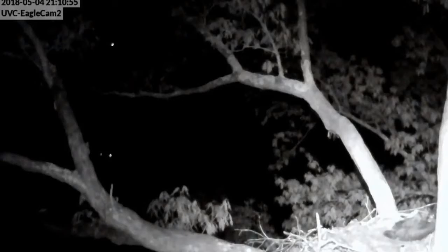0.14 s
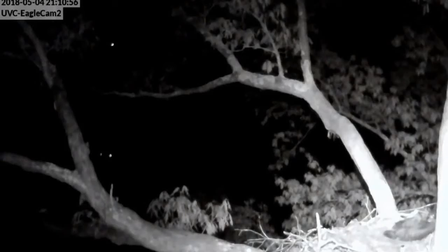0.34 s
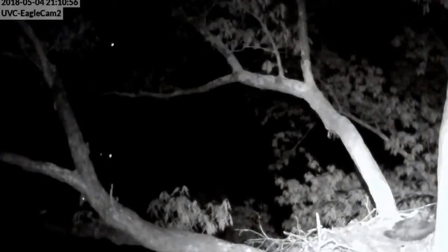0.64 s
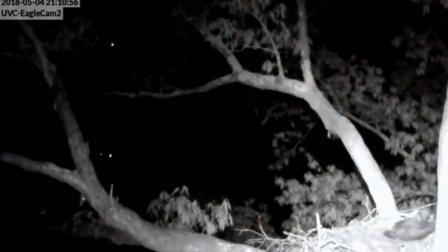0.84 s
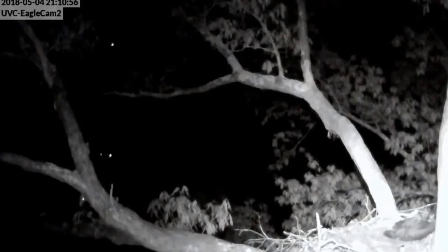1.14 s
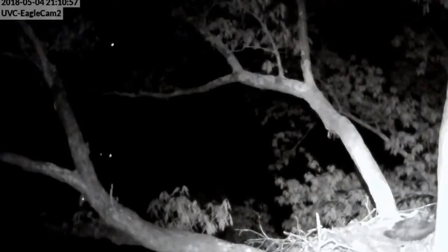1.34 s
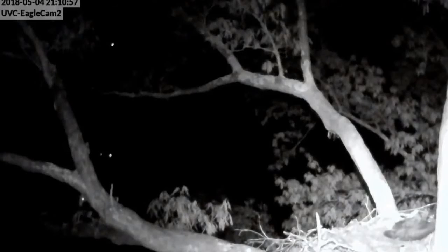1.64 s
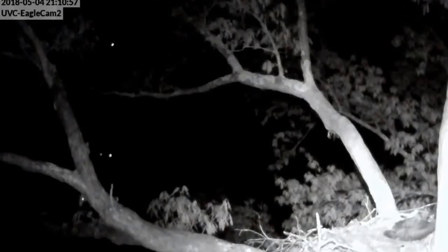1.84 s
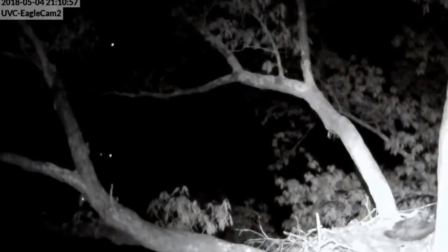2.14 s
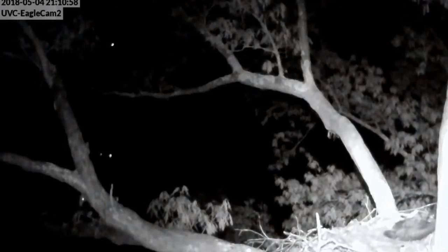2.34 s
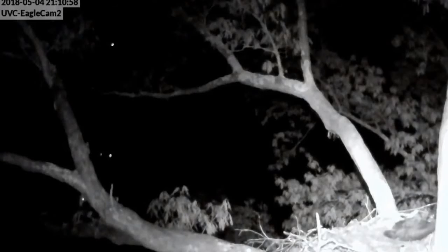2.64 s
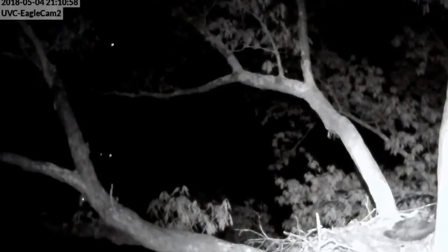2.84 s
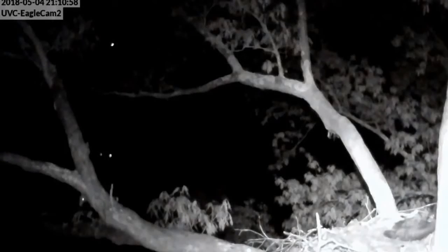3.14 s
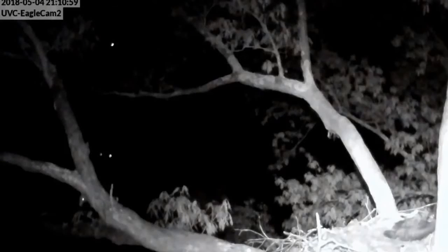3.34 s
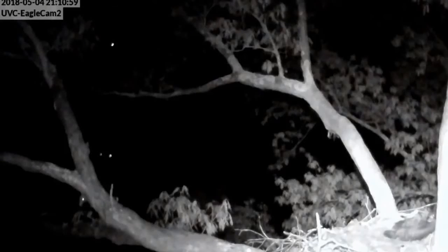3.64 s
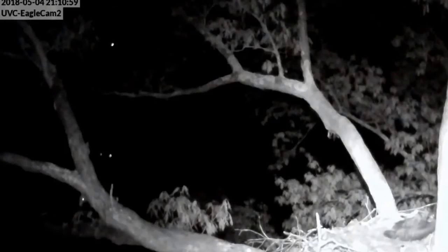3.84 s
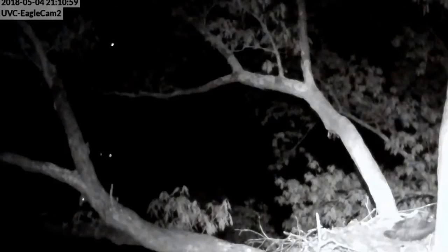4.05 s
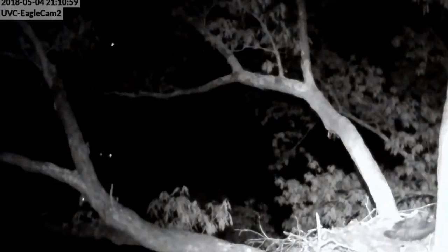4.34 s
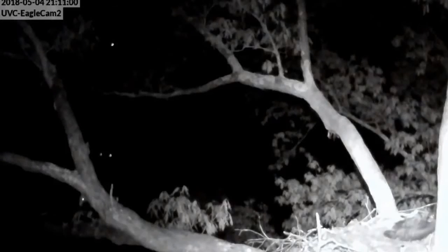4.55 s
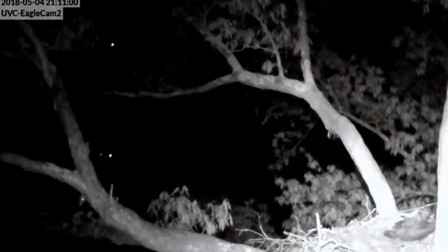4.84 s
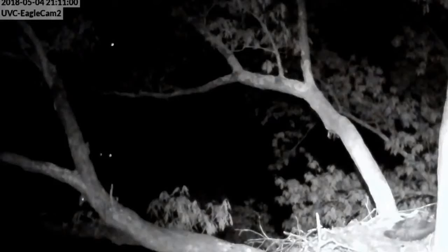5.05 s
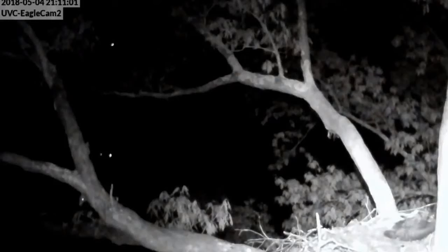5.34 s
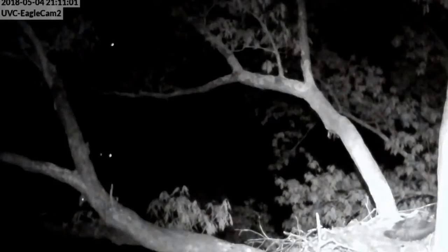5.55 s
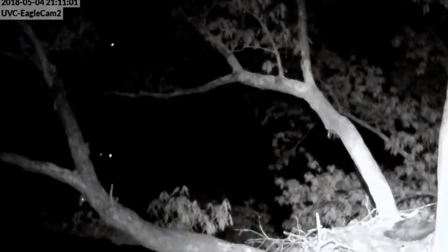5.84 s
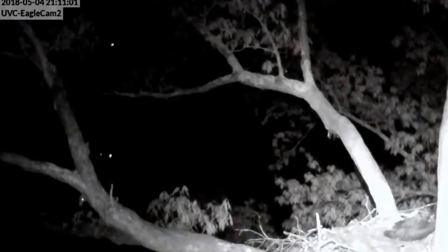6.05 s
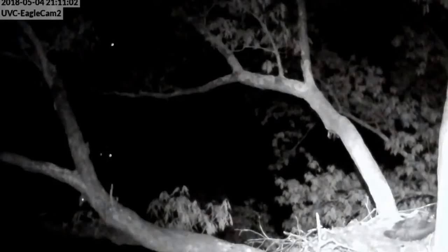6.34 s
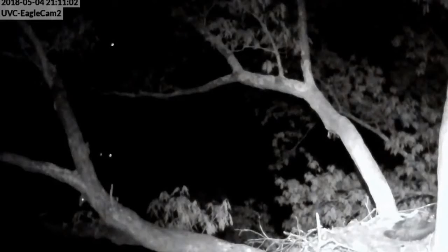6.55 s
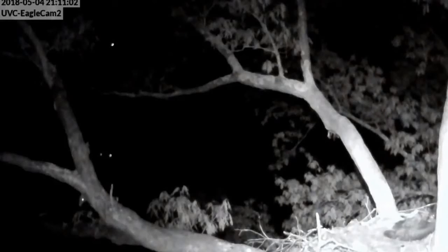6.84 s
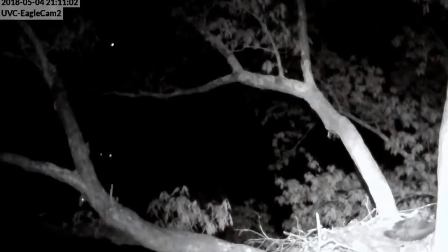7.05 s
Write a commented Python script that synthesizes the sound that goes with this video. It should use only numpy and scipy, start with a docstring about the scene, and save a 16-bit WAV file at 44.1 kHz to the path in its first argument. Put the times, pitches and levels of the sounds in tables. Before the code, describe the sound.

Night alarm calls from large birds: a loud rasping, clacking burst, a gap, then rapid chatter at about ten syllables a second. As it dies, a rounder owl-like hoot rises and falls with a fluttering end. Quiet follows, then piercing squeaky chatter, a lone late squeal and a final pair of calls. Woodland reverberation, soft hiss and a distant low hum surround them, captured by a gritty outdoor microphone with slightly clipped peaks.

```python
"""An eagles' nest high in a tree at night, heard through a low-rate outdoor microphone.
The birds chatter in alarm: hoarse syllables of noise puffs and uneven throat clacks, many breaking into
shrill, stuttering whistles. As a bout dies out a lower hoot, perhaps an owl's, rises, holds and sinks with
a waver: harmonics through a throat resonance. Decaying-noise echoes give the wood's ring over air and hum."""
import sys
import numpy as np
from scipy import signal
from scipy.fft import rfft, irfft, next_fast_len
from scipy.io import wavfile
from scipy.ndimage import uniform_filter1d

SR = 44100
rng = np.random.default_rng(int(sys.argv[2]) if len(sys.argv) > 2 else 0)


def file_out(sig):
    """Save sig as 16-bit WAV at sys.argv[1]."""
    # one column per channel
    cols = np.atleast_2d(sig).T
    # limit, then scale
    lim = np.clip(cols, -1, 1)
    pcm = np.round(lim * 32767).astype(np.int16)
    wavfile.write(sys.argv[1], SR, pcm)


N = 317079
TIME_S = np.arange(N) / SR

# All levels in the tables are relative; each source adds its own gain.
# chatter syllables: (start [s], end [s], rasp level [dB], rattle level [dB], ring pitch [Hz])
SYLLABLE_ROWS = [(0, .09, -36, -31, 2250), (0.088, .17, -30.5, -18.5, 2080),
                 (0.169, 0.231, -25.5, -24, 2050), (0.346, 0.4, -37.5, -36, 2300),
                 (.398, .5, -25.5, -22, 2150), (.497, 0.537, -33.5, -32, 2070),
                 (1.219, 1.369, -43.5, -36, 1865), (1.423, 1.488, -39, -26, 1874),
                 (1.504, 1.59, -41.5, -29, 1960), (1.604, 1.68, -37.5, -26.5, 1940),
                 (1.701, 1.766, -32, -23, 1975), (1.79, 1.853, -31.5, -23.5, 1996),
                 (1.889, 1.951, -36, -33.5, 1970), (1.998, 2.047, -35, -26, 1970),
                 (2.099, 2.137, -41, -36.5, 1970), (2.207, 2.322, -43, -36.5, 1804),
                 (2.353, 2.427, -35, -23, 1890), (2.759, 2.826, -56, -38, 1920),
                 (4.321, 4.405, -39.5, -27.5, 1980), (4.44, 4.508, -34, -29.5, 1920),
                 (4.559, 4.626, -32.5, -29.5, 2080), (4.68, 4.744, -32.5, -31.5, 2030),
                 (4.79, 4.851, -34.5, -29.5, 2020), (4.904, 4.961, -38, -31.5, 1950),
                 (5.017, 5.065, -39.5, -30.5, 2200), (5.113, 5.159, -46, -32.5, 1970),
                 (5.233, 5.28, -48.5, -36.5, 1935), (5.551, 5.609, -52, -52, 1910),
                 (5.719, 5.792, -40.5, -39, 1890), (5.924, 6.01, -54, -47, 1794),
                 (6.865, 6.923, -40.5, -36.5, 1995), (7.006, 7.075, -33, -42, 2000)]
# hard clacks standing out of the rattle: (time [s], ring pitch [Hz], level [dB], thud level [dB])
CLACK_ROWS = [(.086, 2380, -20, -31), (.0977, 2015, -15, -34), (.158, 2010, -15, -19),
              (.183, 2730, -14.5, -34), (.194, 2045, -13, -27), (0.2056, 1965, -12, -30),
              (0.2146, 1903, -14.5, -26), (0.4091, 2000, -15.5, -24), (0.4446, 2000, -10, -37),
              (0.4546, 1990, -12, -36), (0.4738, 1930, -17.5, -33), (0.4918, 1920, -18.5, -24.5),
              (1.263, 1880, -29, -29), (1.4495, 1940, -23.5, -28.5), (1.5058, 1970, -29, -41),
              (1.6146, 2016, -12.5, -23), (1.7081, 1980, -12, -23), (1.8329, 2110, -25, -23.5),
              (1.8935, 1963, -16, -34), (2.2255, 1780, -27.5, -35.5), (2.3003, 1710, -27.5, -49),
              (2.361, 1870, -23, -40), (2.3927, 1840, -21, -28.5), (4.4416, 2010, -14, -29),
              (4.4464, 1894, -15, -33), (4.5651, 2060, -20.5, -30), (4.6817, 2014, -16, -37),
              (4.7378, 2020, -22, -38.5), (4.9104, 1950, -22.5, -37.5), (4.9533, 1925, -15.5, -30),
              (5.2326, 1943, -28, -34), (7.0141, 1980, -20, -35)]
# voice breaks into a whistle: (time [s], pitch [Hz], level [dB], length [s], roughness [0-1],
# stutter gap [s], first stutter re whistle [dB])
SQUEAK_ROWS = [(0.076, 4030, -30, 0.019, 0.3, .012, -16), (0.174, 3520, -25, 0.0054, 0.8, 0.0091, -18),
               (0.364, 3800, -19.5, 0.01, .28, .01, -22), (0.374, 4280, -24.5, 0.011, 0.44, .01, -10),
               (0.432, 3607, -16.5, 0.0033, 0.54, .008, -12), (.466, 2907, -17.5, 0.0054, 0.58, .01, -2),
               (1.324, 3020, -34.5, 0.03, 0.45, .015, -14), (1.43, 3550, -25.5, 0.0085, 0.16, 0.017, -5),
               (1.539, 3712, -22, 0.0095, 0.34, 0.014, -1), (1.63, 4054, -13, 0.0083, 0.41, .0115, -2),
               (1.723, 3910, -14.5, 0.0037, 0.41, 0.0085, -3), (1.814, 3165, -24, .012, 0.98, .01, -16.5),
               (1.912, 3158, -4, .0068, 0.08, 0.0092, -16), (2.264, 3650, -28, 0.018, 0, 0.03, -6.5),
               (2.378, 3690, -41, 0.025, 0.1, 0.0086, -22), (4.367, 3480, -32, .013, 0.78, 0.011, -15),
               (4.46, 3835, -5, 0.00526, 0.15, .0145, -1.3), (4.58, 3858, -3.5, 0.0063, 0.11, .015, -11.5),
               (4.7, 3157, -4, 0.0068, .04, .011, -23.5), (4.812, 3082, -6, 0.0043, .08, .0075, -9),
               (4.93, 2925, -12.5, 0.0041, .19, .01, -24), (5.036, 3710, -22, 0.0067, 0.19, 0.0059, -5.5),
               (5.132, 3550, -38, 0.011, 0.5, 0.0094, -15), (5.252, 3287, -37, 0.0069, 0.72, .01, -15),
               (5.741, 2783, -4.5, 0.0098, 0.04, 0.02, -2), (6.905, 2882, -5, 0.0058, 0.01, .006, -15),
               (7.032, 3100, -9, 0.006, 0.17, .01, -25), (7.044, 3159, -3.5, 0.01, 0.06, .012, -28),
               (7.059, 3041, -7.5, 0.0096, 0.19, .007, -11)]
# spectrum of the hoarse air: (frequency [Hz], density [dB per Hz])
RASP_SPECTRUM = [(40, -21), (100, -2.5), (180, -3.5), (600, -19.5), (790, -16), (1050, -38), (1550, -16.5),
                 (1990, 2.5), (2400, -5), (2800, -5), (3700, -7), (4300, -22), (4900, -31.5), (5400, -19.5),
                 (6200, -72)]
# spectrum of a clack's low thud: (frequency [Hz], density [dB per Hz])
THUD_SPECTRUM = [(40, -21), (100, -2.5), (200, 2.5), (400, -11), (620, -9), (790, -3), (1000, -33.5),
                 (1500, -40.5), (4000, -78)]
# spectrum of a clack's snap: (frequency [Hz], density [dB per Hz])
SNAP_SPECTRUM = [(900, -38.5), (1500, -4.5), (2300, -5.5), (2800, -1), (3700, -7), (4800, -25),
                 (5400, -11.5), (6200, -63.5)]
# course of the hoot: (time [s], pitch [Hz], level [dB])
HOOT_COURSE = [(2.439, 262.4, -41.5), (2.452, 287, -20), (2.478, 382, -19), (2.502, 514, -15.5),
               (2.601, 536.1, -9), (2.7, 542.8, -11.5), (2.8, 562.3, -11), (2.88, 600.6, -9.5),
               (2.935, 527.4, -12.5), (3.01, 443, -19), (3.07, 364.8, -18.5), (3.2, 318, -20),
               (3.27, 275.4, -19), (3.385, 192, -35.5)]
# resonance of the hooting throat: (frequency [Hz], gain [dB])
THROAT_GAIN = [(200, -11), (285, -16), (360, -10.5), (435, -5), (550, 3), (720, -2.5), (800, -4.5),
               (870, -15.5), (1000, -32.5), (1300, -42.5), (1620, -35.5), (2200, -39.5), (3300, -46.5),
               (4200, -77)]
# ring of the wood: (frequency [Hz], decay by 60 dB [s])
WOOD_T60_S = [(200, 1.7), (600, 1.2), (2000, 0.59), (2800, 1.085), (3900, 0.83), (5500, 0.79)]
# spectrum of the night air: (frequency [Hz], density [dB per Hz])
AIR_SPECTRUM = [(15, 1), (50, 0.5), (90, 1), (150, -3), (330, -9.5), (690, -13.5), (790, -2.5), (870, -14),
                (950, -6.5), (1080, -18), (1700, -17.5), (1960, -9.5), (2200, -20.5), (2750, -15),
                (3200, -23), (5400, -26), (6000, -81.5)]
# distant hum: (time [s], level [dB])
HUM_LEVEL = [(0, -56), (.6, -51.5), (1.1, -54), (1.7, -50), (4.3, -51), (5.5, -66), (7.19, -62)]

# rattle: median pulse rate, spread of log spacing, level spread, pause either side of a hard clack
RATTLE_PER_S, RATTLE_UNEVEN, RATTLE_SPREAD_DB, RATTLE_PAUSE_S = 85.0, .22, 2.0, .007
RING_SPREAD = .04   # share of the syllable's ring pitch
# rattle thud at pulse level 0 dB; dB of thud per dB of pulse
THUD_AT_0_DB, THUD_FOLLOWS = -15.0, .8
# decay of one rasp puff; steady air added to puffs of rms 1
PUFF_S, STEADY_AIR = .002, .35
# flick ahead of each whistle: lead, pitch ratio, level re whistle, further loss per second of whistle length
FLICK_LEAD_S, FLICK_RATIO, FLICK_DB, FLICK_LOSS_DB_PER_S = .006, 1.6, -4.5, 3301
# stutters: power of their number in the dB loss; growth of length and roughness per stutter (shares)
STUTTER_FADE, STUTTER_STRETCH, STUTTER_ROUGHENS = 2.24, 0.11, 0.45
OCTAVE_PITCH_HZ = 2760   # whistle pitch at which octave_db holds
# hoot waver: rate, time of one crest, onset, rise, full depth as a share of the pitch
WAVER_HZ, WAVER_PEAK_S = 17.14, 3.15
WAVER_START_S, WAVER_RISE_S, WAVER_DEPTH = 2.91, 0.07, .035
CUTOFF_HZ = 16000


def from_db(db):
    """Level [dB] to amplitude."""
    return 10 ** (np.asarray(db) / 20)


def rms_one(x):
    """Scale to rms 1."""
    return x / np.sqrt(np.mean(x ** 2) + 1e-20)


def in_time(rows):
    """One curve over time per column after the first."""
    times_s, *columns = np.transpose(rows)
    return [np.interp(TIME_S, times_s, column) for column in columns]


def at_hz(points, hz):
    """Read a table along log frequency."""
    freqs_hz, values = np.transpose(points)
    return np.interp(np.log(np.maximum(hz, 1)), np.log(freqs_hz), values)


def coloured(x, spectrum):
    """Weight a sound by a spectrum table; rms 1."""
    size = next_fast_len(N)
    gains = from_db(at_hz(spectrum, np.fft.rfftfreq(size, 1 / SR)))
    return rms_one(irfft(rfft(x, size) * gains, size)[:N])


def noise(spectrum):
    """Coloured Gaussian noise; rms 1."""
    return coloured(rng.standard_normal(N), spectrum)


def drift(points_per_s):
    """Random values joined by straight lines; rms 1."""
    return rms_one(np.interp(TIME_S * points_per_s, np.arange(N), rng.standard_normal(N)))


def near(start_s, end_s):
    """The samples between two times."""
    return slice(max(int(start_s * SR), 0), max(int(end_s * SR), 1))


def burst(age_s, rise_s, decay_s):
    """A quick swell that dies away exponentially; height 1."""
    age_s = np.maximum(age_s, 0)
    shape = (1 - np.exp(-(age_s / rise_s) ** 2)) * np.exp(-age_s / decay_s)
    return shape / (shape.max() + 1e-12)


def clacks(ring_db=0.5, snap_db=-13.0, thud_db=-3.5):
    """Each pulse snaps, rings the throat for a few cycles and carries a low thud."""
    out, snap, thud = np.zeros(N), noise(SNAP_SPECTRUM), noise(THUD_SPECTRUM)
    for time_s, ring_hz, level_db, low_db in CLACK_ROWS + rattle():
        span = near(time_s - .005, time_s + .04)
        age_s = TIME_S[span] - time_s
        ring = burst(age_s, rise_s=0.0011, decay_s=0.0031) * np.sin(2 * np.pi * ring_hz * age_s)
        out[span] += from_db(level_db + ring_db) * ring
        out[span] += from_db(level_db + snap_db) * burst(age_s, rise_s=0.0012, decay_s=0.0037) * snap[span]
        out[span] += from_db(low_db + thud_db) * burst(age_s, rise_s=.001, decay_s=0.0062) * thud[span]
    return out


def rattle():
    """Runs of weak, uneven throat pulses in the syllables, as rows like those of CLACK_ROWS."""
    pulses, hard_s = [], np.array(CLACK_ROWS)[:, 0]
    chances = rng.standard_normal((len(SYLLABLE_ROWS), 3, 24))
    for (start_s, end_s, _, db, ring_hz), (gaps, sizes, detunes) in zip(SYLLABLE_ROWS, chances):
        steps_s = np.exp(RATTLE_UNEVEN * gaps) / RATTLE_PER_S
        times_s = start_s + np.cumsum(steps_s) - steps_s[0]
        levels_db = db + RATTLE_SPREAD_DB * sizes
        for time_s, level_db, detune in zip(times_s, levels_db, detunes):
            if time_s < end_s and np.abs(time_s - hard_s).min() > RATTLE_PAUSE_S:
                pulse_hz = ring_hz * (1 + RING_SPREAD * detune)
                pulses.append((time_s, pulse_hz, level_db, THUD_AT_0_DB + THUD_FOLLOWS * level_db))
    return pulses


def rasps(level_db=-1.0, spread_db=4.5, edge_s=0.009, slips_per_s=330.0):
    """Hoarse air escapes in small sharp puffs that swell and fade with each syllable."""
    effort = np.zeros(N)
    for start_s, end_s, db, *_ in SYLLABLE_ROWS:
        span = near(start_s - .03, end_s + .03)
        t = TIME_S[span]
        opening = (1 + np.tanh((t - start_s) / edge_s)) / 2
        closing = (1 + np.tanh((end_s - t) / edge_s)) / 2
        effort[span] += from_db(db) * opening * closing
    # one slip at each whole turn of an unsteady rate
    turns = np.floor(np.cumsum(slips_per_s * from_db(4.0 * drift(200))) / SR)
    strengths = from_db(spread_db * np.clip(rng.standard_normal(N), -2, 1.5))
    slips = np.diff(turns, prepend=0) * strengths
    puffs = rms_one(signal.lfilter([1], [1, -np.exp(-1 / (PUFF_S * SR))], slips))
    return from_db(level_db) * effort * rms_one(puffs + STEADY_AIR) * noise(RASP_SPECTRUM)


def squeaks(level_db=0.0, fall=.007, bend=.018, scatter_rad=2.0, shimmer_db=5.0, skirt=0.15, octave_db=-35.5):
    """Short whistles, sharp at their edges and sagging at full force; rough ones shake in phase and level."""
    out, shake, shimmer = np.zeros(N), drift(830), drift(600)
    for time_s, hz, db, length_s, rough in whistles():
        span = near(time_s - .05, time_s + .05)
        along = (TIME_S[span] - time_s) / (length_s / 2)
        pitch_hz = hz * (1 - fall * np.tanh(along) + bend * np.tanh(along ** 2 / 2))
        phase = 2 * np.pi * np.cumsum(pitch_hz) / SR + scatter_rad * rough * shake[span]
        # loud core inside a softer, longer skirt
        core = .5 ** (np.abs(along) ** 3.1)
        swell = (1 - skirt) * core + skirt * np.exp(-(along / 3.0) ** 2)
        # faint octave, weaker on higher whistles
        octave = from_db(octave_db) * (OCTAVE_PITCH_HZ / hz) ** 6.5 * np.sin(2 * phase)
        gain = from_db(db + level_db + shimmer_db * rough * shimmer[span])
        out[span] += gain * swell * (np.sin(phase) + octave)
    return out


def whistles(count=3):
    """Flick, whistle and stutters of each squeak: (time [s], pitch [Hz], level [dB], length [s], roughness)."""
    rows = []
    for time_s, hz, db, length_s, rough, gap_s, stutter_db in SQUEAK_ROWS:
        flick_db = db + FLICK_DB - FLICK_LOSS_DB_PER_S * length_s
        rows.append((time_s - FLICK_LEAD_S, hz * FLICK_RATIO, flick_db, length_s / 2, .4))
        # k = 0 is the whistle itself
        for k in range(count):
            rows.append((time_s + k * gap_s, hz, db + stutter_db * k ** STUTTER_FADE,
                         length_s * (1 + STUTTER_STRETCH * k), rough * (1 + STUTTER_ROUGHENS * k)))
    return rows


def hoot(level_db=-2.0, jitter=0.0025, quake=.35, overtones_db=0.0, slope_db=-1.5, purity=.25,
         uneven_db=3.5, count=6):
    """Harmonics pass one narrow throat resonance: as the pitch sinks, the second takes over from the first."""
    pitch_hz, db = in_time(HOOT_COURSE)
    depth = WAVER_DEPTH * np.clip((TIME_S - WAVER_START_S) / WAVER_RISE_S, 0, 1)
    # the wavering end is also the unsteady part
    unsteady = (jitter + quake * depth) * drift(160)
    waver = depth * np.cos(2 * np.pi * WAVER_HZ * (TIME_S - WAVER_PEAK_S))
    pitch_hz = pitch_hz * (1 + waver + unsteady)
    phase = 2 * np.pi * np.cumsum(pitch_hz) / SR
    k = np.arange(1, count + 1)[:, None]
    # the louder the hoot, the weaker its overtones
    louder_db = db - np.mean([row[2] for row in HOOT_COURSE])
    overtone_db = (overtones_db - purity * louder_db) * (k > 1)
    gains = from_db(at_hz(THROAT_GAIN, k * pitch_hz) + overtone_db + slope_db * np.log2(k))
    # random level and phase changes make the harmonics above 1300 Hz uneven
    upper = k * pitch_hz > 1300
    gains = gains * from_db(uneven_db * upper * np.array([drift(68) for _ in range(count)]))
    phase_shift = upper * (k - 1) * drift(240) / 4
    harmonics = (gains * np.sin(k * phase + phase_shift)).sum(axis=0)
    # the table alone sets the level, whatever the harmonic mix
    voice = harmonics / np.sqrt((gains ** 2).sum(axis=0) / 2)
    sounding = (TIME_S > HOOT_COURSE[0][0]) * (TIME_S < HOOT_COURSE[-1][0])
    return from_db(db + level_db) * voice * sounding


def hoot_catch(start_s=2.441, level_db=-22.5, centre_hz=680.0, width=0.087):
    """The throat catches in a hoarse burst of band noise just before the hoot finds its pitch."""
    edges_hz = centre_hz * np.exp([-width, width])
    band = signal.butter(2, edges_hz, "band", fs=SR, output="sos")
    hoarse = rms_one(signal.sosfilt(band, rng.standard_normal(N)))
    return from_db(level_db) * burst(TIME_S - start_s, rise_s=.009, decay_s=.018) * hoarse


def wood(x, near_db, far_db, near_t60_s=0.3, gap_s=0.0048, dull_hz=3860.0, rustle=.55):
    """Close limbs scatter quickly; farther trunks return a long tail; foliage dulls and roughens both."""
    t = TIME_S[:SR]
    white, tail = rng.standard_normal((2, SR)), np.zeros(SR)
    edges_hz = np.geomspace(100, 6400, 13)
    for k, (low_hz, high_hz) in enumerate(zip(edges_hz, edges_hz[1:])):
        sos = signal.butter(2, [low_hz, high_hz], "band", fs=SR, output="sos")
        band = signal.sosfilt(sos, white[k % 2])
        t60_s = at_hz(WOOD_T60_S, np.sqrt(low_hz * high_hz))
        tail += band * np.exp(-np.log(1000) * t / t60_s)
    scatter = rng.standard_normal(SR) * np.exp(-np.log(1000) * t / near_t60_s)
    onset = 1 - np.exp(-(t / gap_s) ** 2)
    echoes = (from_db(near_db) * scatter + from_db(far_db) * tail) * onset
    echoes = signal.sosfilt(signal.butter(2, dull_hz, fs=SR, output="sos"), echoes)
    return x + signal.fftconvolve(x, echoes)[:N] * rms_one(1 + rustle * drift(450))


def night(air_db=-47.5, hum_hz=116.0, wander=.015):
    """Still air as coloured noise, and a distant hum: a sine wavering in pitch and level."""
    hum_db, = in_time(HUM_LEVEL)
    phase = 2 * np.pi * np.cumsum(hum_hz * (1 + wander * drift(8.6))) / SR
    hum = np.sqrt(2) * from_db(hum_db + 0.5 * drift(6.8)) * np.sin(phase)
    return from_db(air_db) * noise(AIR_SPECTRUM) + hum


def scene():
    """Chatter, squeaks and hoot, each with its own echoes, over the night."""
    chatter = wood(clacks() + rasps(), near_db=-42.5, far_db=-49.5, rustle=0.18)
    shrieks = wood(squeaks(), near_db=-39.0, far_db=-48.0, rustle=0.28)
    owl = wood(hoot() + hoot_catch(), near_db=-57.5, far_db=-49.5, rustle=0)
    return (chatter + shrieks + owl + night())[None]


def record(dry, top=0.49, lift=0.13, offset=-.013, step_count=4, hold_count=3):
    """Quarter-rate sampling, clipped at top; held samples mirror the sound into the treble."""
    slow = np.clip(dry[:, ::step_count], -top, top)
    # treble lift
    slow = signal.lfilter([-lift, 1 + 2 * lift, -lift], [1], slow)
    out = np.repeat(slow, step_count, axis=1)[:, :N]
    # further holds smooth the steps
    for _ in range(hold_count - 1):
        out = uniform_filter1d(out, step_count, axis=1)
    # remove the bass images next to the low sampling rate
    notch = signal.butter(4, [9300, 12800], "bandstop", fs=SR, output="sos")
    out = signal.sosfilt(notch, out)
    lowpass = signal.ellip(10, .1, 80, CUTOFF_HZ, fs=SR, output="sos")
    # the converter rests slightly off zero
    return offset + signal.sosfilt(lowpass, out)


dry = scene()
out = record(dry)
file_out(out)
```